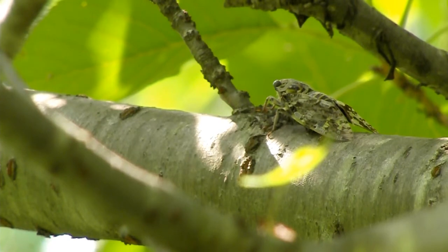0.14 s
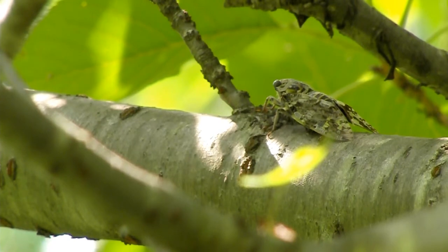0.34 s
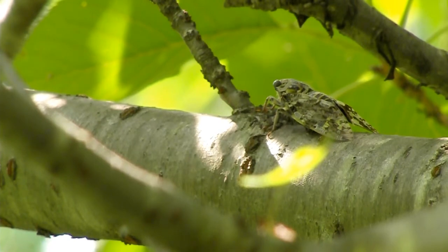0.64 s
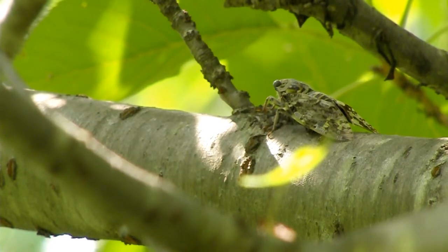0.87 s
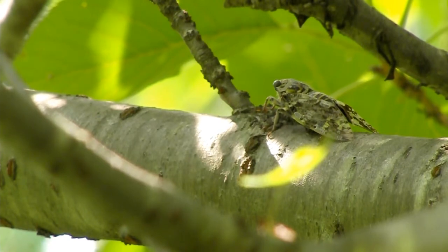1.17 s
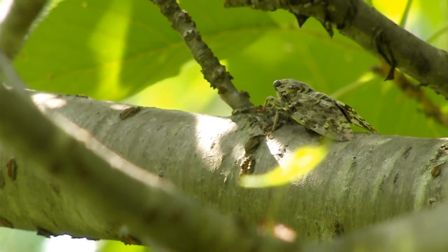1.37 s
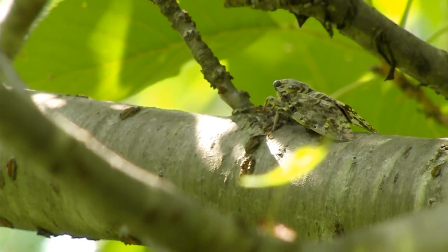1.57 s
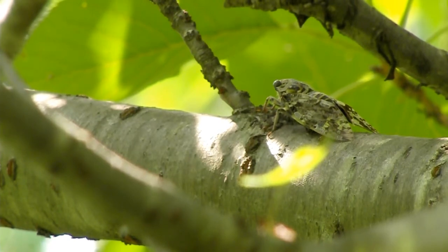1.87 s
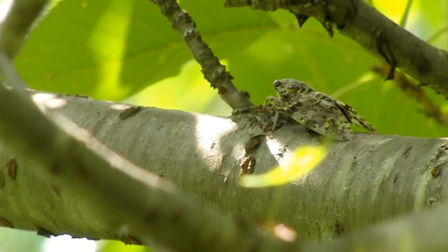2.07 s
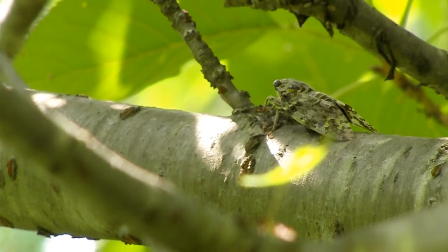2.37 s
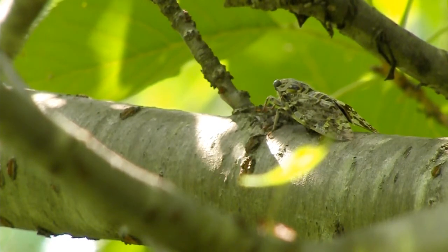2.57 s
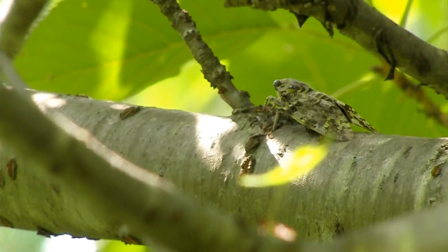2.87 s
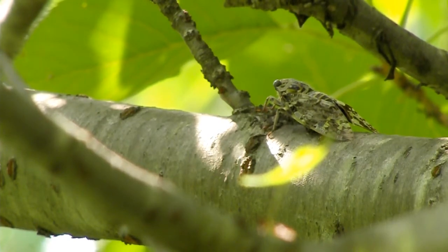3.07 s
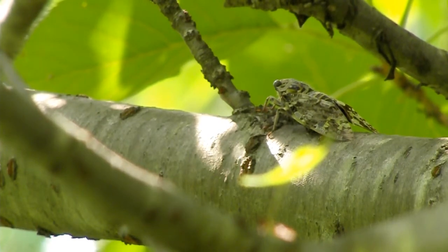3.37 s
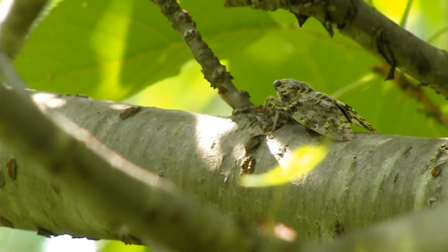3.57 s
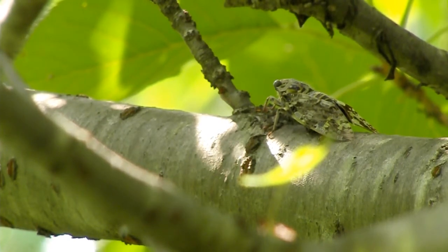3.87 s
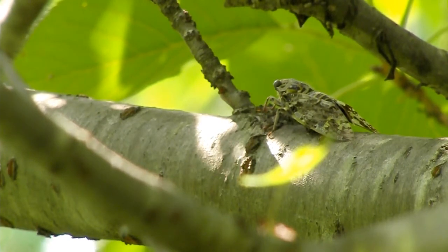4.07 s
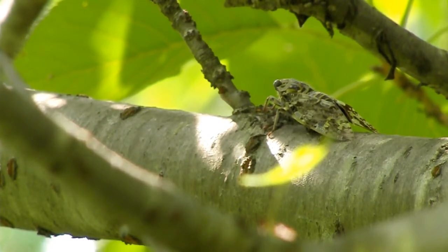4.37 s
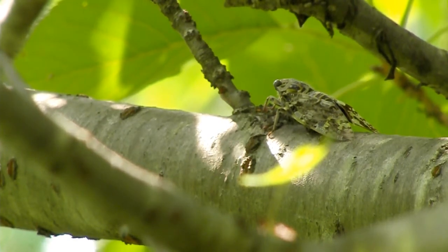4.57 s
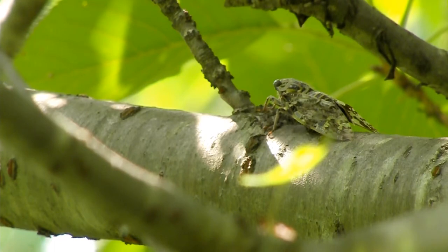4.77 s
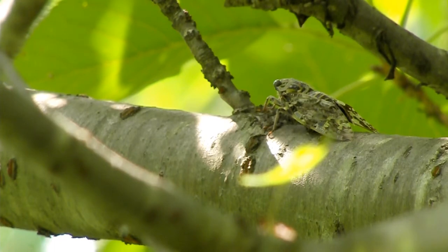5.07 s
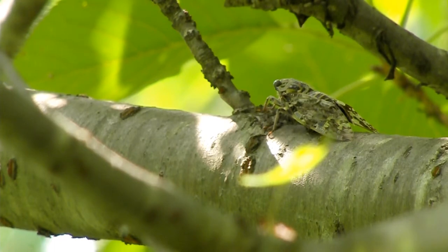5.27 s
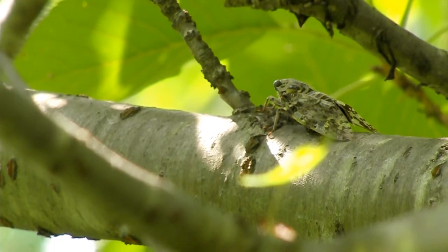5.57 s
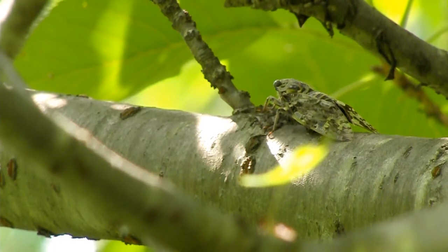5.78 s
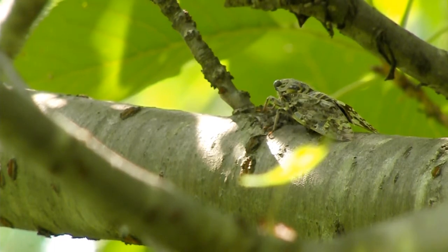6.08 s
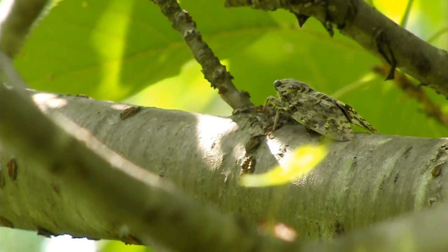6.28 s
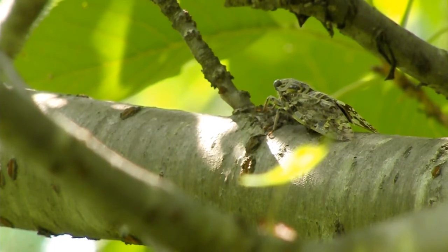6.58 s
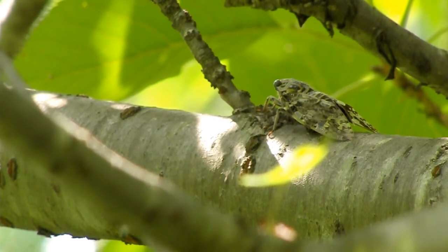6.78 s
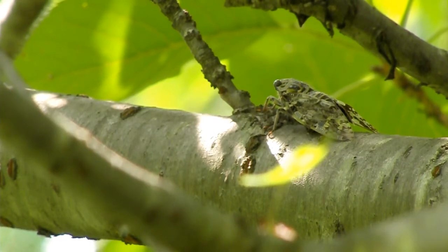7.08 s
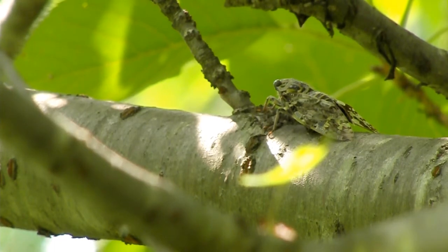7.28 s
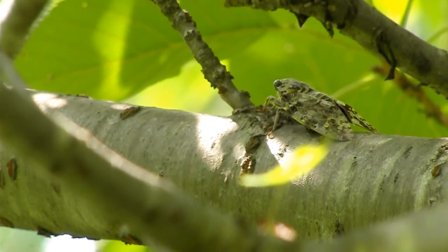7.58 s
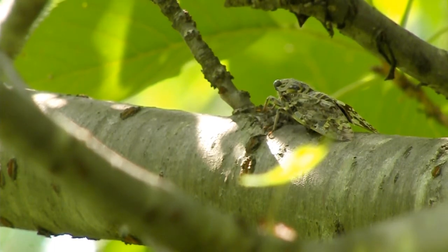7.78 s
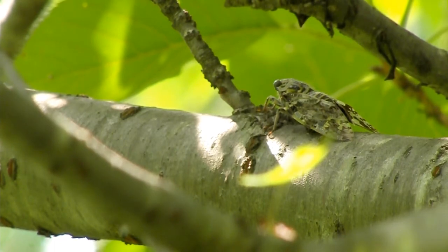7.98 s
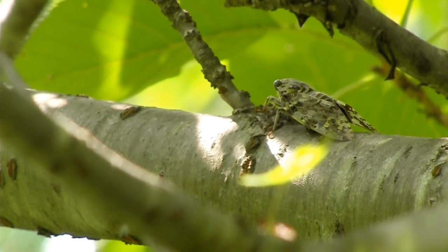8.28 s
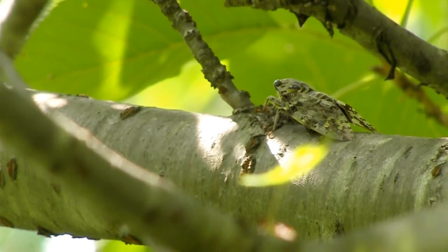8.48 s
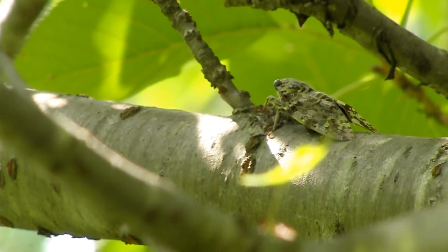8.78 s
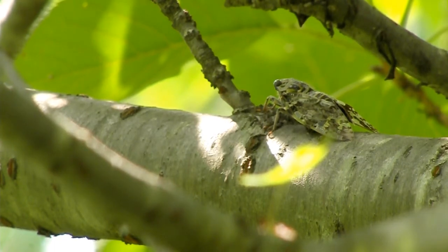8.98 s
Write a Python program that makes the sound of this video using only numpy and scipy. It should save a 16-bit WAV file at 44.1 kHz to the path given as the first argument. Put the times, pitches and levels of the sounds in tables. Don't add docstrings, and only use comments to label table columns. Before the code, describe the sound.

Close cicadas hold a continuous, very high, grainy sizzle among leafy trees. Behind them a farther cicada idles on a throbbing buzz, winds up louder and higher after one second, holds with a slight sag, then abruptly drops back at eight. A blurred distant insect chorus, soft rasps, light wind and faint cars lie underneath. A small tap hits the microphone near 2.7 seconds, and the treble opens up. Wide stereo.

```python
import sys
import numpy as np
from scipy import signal
from scipy.fft import rfft, irfft, next_fast_len
from scipy.io import wavfile
from scipy.ndimage import uniform_filter1d

SR = 44100
rng = np.random.default_rng(int(sys.argv[2]) if len(sys.argv) > 2 else 0)


def to_wav(sig):
    pcm = np.clip(np.atleast_2d(sig), -1, 1) * 32767
    pcm = np.round(pcm).astype(np.int16)
    wavfile.write(sys.argv[1], SR, pcm.T)


def to_linear_factor(level_db):
    exponent = np.asarray(level_db, float) / 20
    return 10 ** exponent


N = 403074
T = np.arange(N) / SR
HZ = np.fft.rfftfreq(next_fast_len(N), 1 / SR)
FAR_PAIR = to_linear_factor([[-10], [0]])


def evened(x):
    return x / np.sqrt(np.mean(x ** 2) + 1e-20)


def read(points, hz):
    f, value = np.transpose(points)
    return np.interp(np.log(hz + 1), np.log(f + 1), value)


def bumps(peaks):
    return sum(db / (1 + (2 * (HZ - hz) / width) ** 2) for hz, width, db in peaks)


def shape(x, gain):
    size = next_fast_len(N)
    return irfft(rfft(x, size) * gain, size)[..., :N]


def colour(x, gain_db):
    return shape(x, to_linear_factor(gain_db))


def band(x, hz, width):
    return evened(shape(x, 1 / (1 + (2 * (HZ - hz) / width) ** 2)))


def resonate(x, hz, width):
    turn = np.exp(2j * np.pi * np.cumsum(hz * np.ones(N)) / SR)
    r = np.exp(-np.pi * width / SR)
    smooth = signal.lfilter([1 - r], [1, -r], x / turn + 1e-18)
    return 2 * (turn * smooth).real


def drift(samples):
    once = uniform_filter1d(rng.standard_normal(N), int(samples))
    return evened(uniform_filter1d(once, int(samples)))


def ramp(start_s, length_s):
    return .5 - .5 * np.cos(np.pi * np.clip((T - start_s) / length_s, 0, 1))


def swell(peak_s, span_s):
    return np.exp(-.5 * ((T - peak_s) / span_s) ** 2)


def foliage(x, t60, wet_db):
    taps = np.zeros(SR // 4)
    at = np.arange(40, len(taps) - 22, 22)
    signs = rng.choice([-1., 1.], len(at))
    taps[at + rng.integers(0, 22, len(at))] = signs * to_linear_factor(-60 * at / SR / t60)
    taps *= to_linear_factor(wet_db) / np.linalg.norm(taps)
    return evened(x + signal.oaconvolve(x, taps)[:N])


def rib_snaps():
    # tymbal buckle rate f/Hz, level/dB
    singers = [
        (477.5, 0),
        (472.5, 0),
        (389, -4),
        (520, -7),
    ]
    heard = np.zeros((2, N))
    for rate_hz, db in singers:
        turns = np.cumsum(rate_hz * (1 + .003 * drift(3000))) / SR
        left_tymbal = np.exp(-(turns % 1) / .3)
        right_tymbal = .35 * np.exp(-((turns + .5) % 1) / .3)
        snaps = (left_tymbal + right_tymbal) * rng.choice([-1., 1.], (2, N)) * (rng.random(N) < .6)
        heard += to_linear_factor(db) * np.array([foliage(ribs, .15, -7) for ribs in snaps])
    return heard


def sizzle():
    # f/Hz, level per Hz/dB
    mid_curve = [(3710, -21), (6300, -3), (6980, -9), (8040, 1.5), (9400, -5.5), (10100, -0.5),
                 (11200, -4.5), (12100, -1), (13200, -7), (14900, -6.5), (15600, -9)]
    side_curve = [(4000, -34), (6300, -11), (6930, -15), (7420, -10.5), (7800, -1.5), (8300, -3),
                  (9290, -4.5), (9700, -1), (10200, 0), (10900, -3), (11800, -1), (13400, -9),
                  (14900, -7.5), (15600, -17)]
    # f/Hz, width/Hz, level/dB
    mid_rings = [(7149, 96, 2.6), (7299, 80, 4.5), (7493, 48, 2.7), (7687, 80, 4.5), (7859, 98, 5.7),
                 (8236, 74, 5.0), (8624, 44, 3.8), (8742, 66, 4.2), (9797, 52, 5.8), (10023, 35, 3.3),
                 (10303, 72, 4.4), (10497, 49, 4.0), (10841, 71, 2.4), (11724, 68, 2.9), (12198, 75, 2.4),
                 (12467, 189, 2.4)]
    side_rings = [(7235, 145, 7.2), (7773, 47, 3.6), (7913, 91, 7.6), (8268, 73, 5.3), (8473, 40, 4.8),
                  (8570, 46, 2.7), (8764, 20, 3.5), (8807, 58, 6.1), (9183, 56, 5.5), (9313, 25, 3.3),
                  (9410, 26, 2.9), (9517, 31, 3.2), (9797, 59, 7.6), (10023, 47, 5.8), (10292, 51, 4.1),
                  (10497, 45, 5.1), (10669, 29, 3.4), (10820, 85, 3.6), (11326, 137, 3.1), (11660, 49, 4.4),
                  (12435, 41, 2.6), (13253, 38, 2.5), (13393, 82, 3.1), (13856, 32, 3.5), (13985, 29, 3.3),
                  (14179, 59, 3.6), (14481, 58, 2.8), (14567, 40, 3.0), (14857, 47, 4.4), (14976, 41, 4.1)]
    # f/Hz, share of the difference found in the sum [1]
    lean = [(6500, -0.38), (7800, 0.12), (8600, -0.18), (9500, -0.23), (11000, -0.18), (11800, -0.018),
            (14500, 0.1), (15500, 0.15)]
    heard = rib_snaps()
    mid = foliage(heard[0], 0.19, -10)
    mid = evened(colour(mid, read(mid_curve, HZ) + 0.42 * bumps(mid_rings)))
    side = foliage(heard[1], .12, -12)
    side = evened(colour(side, read(side_curve, HZ) + 1.3 * bumps(side_rings)))
    pair = to_linear_factor([[-40], [-29.5]]) * np.array([mid, side])
    pair[0] += shape(pair[1], read(lean, HZ))
    cold = np.exp(-T / 1.2)
    effort_db, top_db = 0.16 * (1 - cold), -2.7 * cold
    top = shape(pair, 1 / (1 + (11600 / (HZ + 1)) ** 20))
    return to_linear_factor(effort_db) * (pair + (to_linear_factor(top_db) - 1) * top)


def far_phrase():
    wind_up_s, wind_len_s, drop_s, drop_len_s = 1.15, 1.2, 8.0, .15
    idle_hz, full_hz, sag_hz_per_s, drop_hz = 191.5, 207.3, -.11, -3.6
    idle_db, full_db, swell_db_per_s, drop_db = -47, -39, .3, -7
    throb_start, throb_full, throb_grow_s = .2, 0.49, 4.7
    wound, dropped = ramp(wind_up_s, wind_len_s), ramp(drop_s, drop_len_s)
    hold_s = wind_up_s + wind_len_s
    held_s = np.clip(T, hold_s, drop_s) - hold_s
    rate_hz = idle_hz + (full_hz - idle_hz) * wound + sag_hz_per_s * held_s + drop_hz * dropped
    db = idle_db + (full_db - idle_db) * wound + swell_db_per_s * held_s + drop_db * dropped
    throb_hz = 14.9 + .3 * T
    depth = throb_start + (throb_full - throb_start) * np.minimum(T / throb_grow_s, 1)
    return rate_hz, throb_hz, db, depth


def far_singer():
    # f/Hz, level/dB
    body = [(1400, -40), (1650, -28), (2500, -22), (2800, -40), (3320, -16), (3600, -30), (4850, -12),
            (5200, -1), (5600, 1), (5800, 0), (6020, -8), (6230, -4), (6430, -14), (6850, -9)]
    rate_hz, throb_hz, db, depth = far_phrase()
    throb = 2 * np.pi * np.cumsum(throb_hz * (1 + .03 * drift(4000))) / SR
    wobble = 1 + .0012 * np.sin(throb + 1.2) + .0005 * drift(900)
    turns = np.cumsum(rate_hz * wobble) / SR + .005 * drift(60)
    buzz = sum(np.cos(np.pi * k * .508) * np.cos(2 * np.pi * k * turns) for k in range(7, 34))
    buzz = evened(colour(buzz, read(body, HZ)))
    pumping = np.cos(throb) + 0.19 * np.cos(2 * throb + 0.51)
    buzz *= to_linear_factor(db) * (1 + np.clip(depth, 0, 1) * pumping)
    buzz += to_linear_factor(-61) * (1 - ramp(4.5, 3)) * np.cos(2 * np.pi * 12 * turns)
    level = np.sqrt(np.mean(buzz ** 2))
    paths = np.array([-foliage(buzz, .12, 3), foliage(buzz, .1, -11)])
    return level * FAR_PAIR * paths


def chorus():
    low_db = -47 + 4.5 * swell(2.6, 2.)
    high_db = -47.5 + 0.74 * T
    noise = rng.standard_normal((4, N))
    low = band(noise[:2], 5150, 700)
    high = band(noise[2:], 5700, 1100)
    return FAR_PAIR * (to_linear_factor(low_db) * low + to_linear_factor(high_db) * high)


def rasps():
    # t/s, level/dB
    strokes = [(.04, -49), (.77, -48), (1.63, -49), (2.17, -50), (2.94, -48), (3.82, -51), (4.33, -47),
               (5.44, -49), (6.58, -48), (8.11, -47), (9, -50)]
    strength = sum(to_linear_factor(db) * swell(s, 0.053) for s, db in strokes)
    return FAR_PAIR * strength * band(rng.standard_normal((2, N)), 3500, 1200)


def tones_and_scrape():
    # f/Hz, width/Hz, level/dB, start t/s, end t/s
    tones = [
        (3482, 6, -64, 6.4, 9.5),
        (3310, 10, -62, 5.2, 7.9),
        (5578, 16, -49, -.4, 8),
        (5180, 14, -50, .8, 3.4),
        (5357, 12, -50, 2.2, 7.2),
    ]
    fade_s = 0.37
    hiss = rng.standard_normal((2, N))
    heard = to_linear_factor(-57) * swell(4.58, .05) * band(hiss, 1850, 350)
    for hz, width, db, start, end in tones:
        present = ramp(start, fade_s) * (1 - ramp(end, fade_s))
        heard += to_linear_factor(db) * present * band(hiss, hz, width)
    return FAR_PAIR * heard


def traffic():
    # start t/s, length/s, level/dB, engine f/Hz, glide/(Hz per s)
    cars = [
        (1.548, 1.5, -56, 110, -8.5),
        (4.347, 3.6, -60.5, 60, 0.5),
        (8.1, 1.5, -63.5, 86, -3),
    ]
    rise_s, fall_s = 0.23, 0.77
    gain = to_linear_factor(-68) + 0 * T
    pitch = to_linear_factor(-68) * 83.6
    for s, length, db, hz, glide in cars:
        near = to_linear_factor(db) * ramp(s, rise_s) * (1 - ramp(s + length - fall_s / 2, fall_s))
        gain = gain + near
        pitch = pitch + near * (hz + glide * (T - s))
    return gain, pitch / gain


def air():
    # f/Hz, level per Hz/dB
    mid_curve = [(12, -35), (20, 0), (66, -1), (101, -1.5), (175, -3), (206, -7), (356, -8), (447, -10),
                 (1430, -16.5), (2480, -15), (3260, -14), (4700, -16.5), (6110, -40), (10300, -120)]
    side_curve = [(12, -35), (20, -3), (210, -5), (252, -6.5), (1280, -10.5), (1570, -9.5), (2020, -8.5),
                  (2260, -5), (2480, -5), (2910, -7), (3410, -4), (4100, -6), (4700, 3), (6110, -33),
                  (10300, -120)]
    # f/Hz, share of the sum found in the difference [1]
    lean = [(60, 0), (200, .08), (500, 0.014), (1000, -.08), (2500, -0.014)]
    noise = rng.standard_normal((3, N))
    mid = to_linear_factor(-49 + .5 * drift(7300)) * evened(colour(noise[0], read(mid_curve, HZ)))
    side = to_linear_factor(-44.5 + 0.44 * drift(6000)) * evened(colour(noise[1], read(side_curve, HZ)))
    gain, hz = traffic()
    hum = gain * evened(resonate(resonate(noise[2], hz, 23), hz, 23))
    return np.array([mid + hum, side + shape(mid, read(lean, HZ)) + 0.085 * hum])


def housing_tap():
    # (f/Hz, level/dB, t60/s)
    knock = (2.709, -36.5, [(350, 1.5, 0.033), (730, 0.5, 0.032)])
    s, knock_db, modes = knock
    since = np.maximum(T - s, 0)
    tap = sum(to_linear_factor(knock_db + db - 60 * since / t60) * np.sin(2 * np.pi * hz * since)
              for hz, db, t60 in modes)
    return np.array([tap, .3 * tap])


def scene():
    insects = sizzle() + far_singer() + chorus() + rasps() + tones_and_scrape()
    mid, side = insects + air() + housing_tap()
    return np.array([mid + side, mid - side])


def band_limit(x):
    return signal.sosfilt(signal.butter(12, 15730, fs=SR, output="sos"), x)


def record(dry):
    # f/Hz, width/Hz, level/dB
    notches = [
        (4990, 90, -18),
        (2850, 220, -7),
    ]
    # f/Hz, share of the loss [1]
    weak = [(1800, 0), (2600, .7), (3300, 1.1), (4300, 1.1), (4650, 0), (6400, 0), (6600, 1), (6900, 0),
            (12600, 0), (13500, .7), (15000, 1.4)]
    open_s, open_len_s, settle_s = 2.75, .15, .5
    heard = shape(dry, to_linear_factor(bumps(notches)) * (HZ < 15700))
    opened = ramp(open_s, open_len_s)
    left = np.exp(-np.maximum(T - open_s, 0) / settle_s)
    weak_db = -3.6 * (1 - opened) - 1 * left * opened
    edge_db = -60 * (1 - opened) - 10 * left * opened
    edge_db += -22 * np.clip(drift(600) - .4 + 2 * left, 0, 2)
    weak_db = weak_db + .9 * drift(700)
    heard += (to_linear_factor(weak_db) - 1) * shape(heard.mean(0), read(weak, HZ))
    heard += (to_linear_factor(edge_db) - 1) * shape(heard, HZ > 15050)
    return band_limit(heard)


dry = scene()
out = record(dry)
to_wav(out)
```